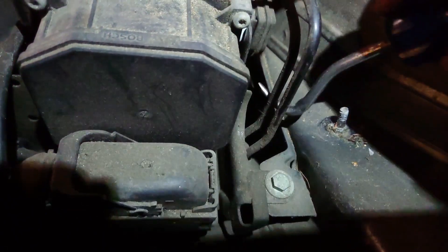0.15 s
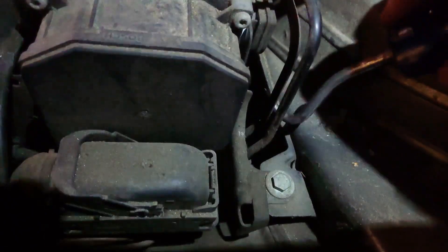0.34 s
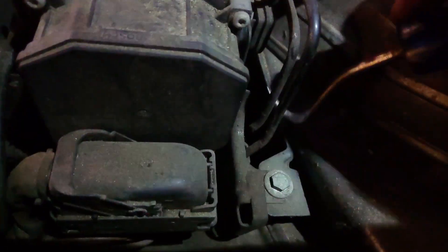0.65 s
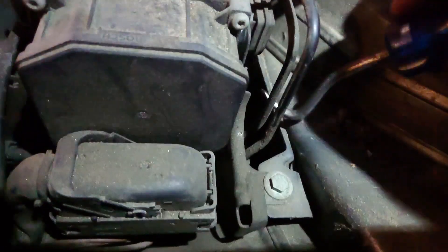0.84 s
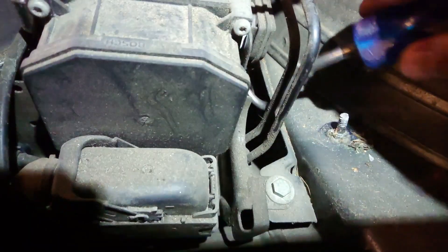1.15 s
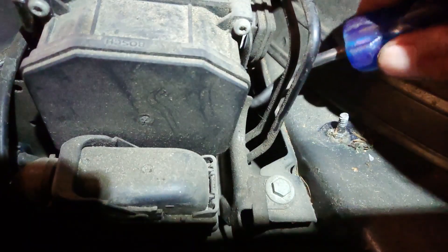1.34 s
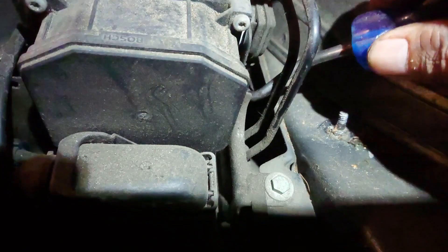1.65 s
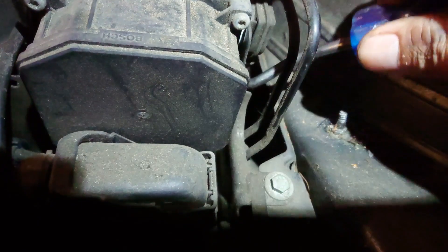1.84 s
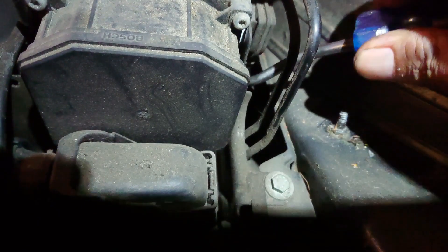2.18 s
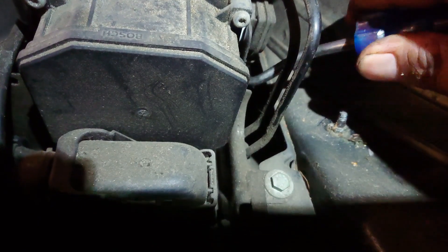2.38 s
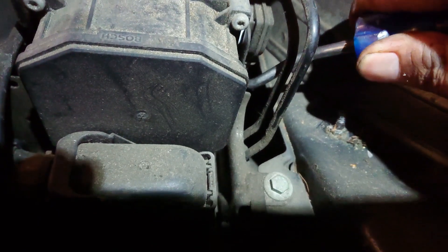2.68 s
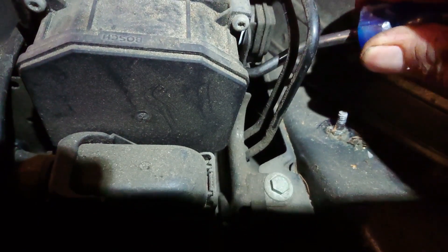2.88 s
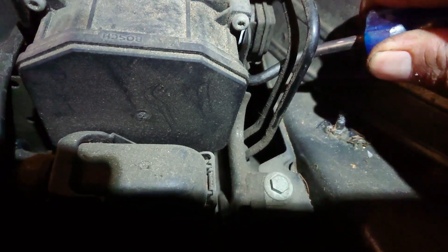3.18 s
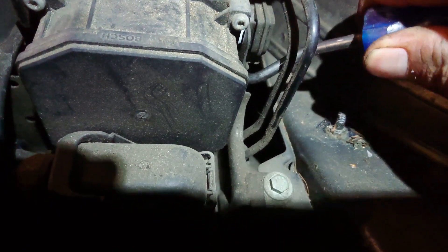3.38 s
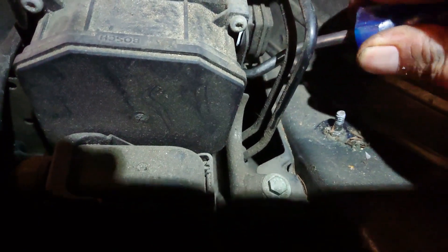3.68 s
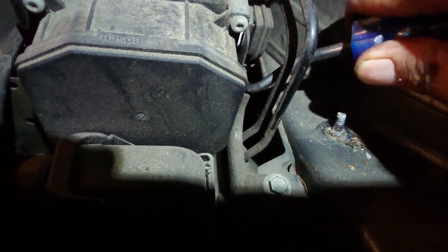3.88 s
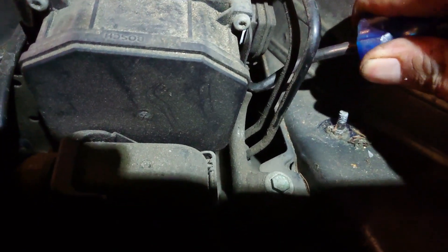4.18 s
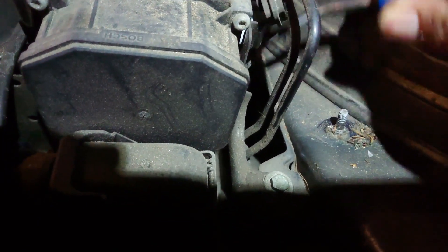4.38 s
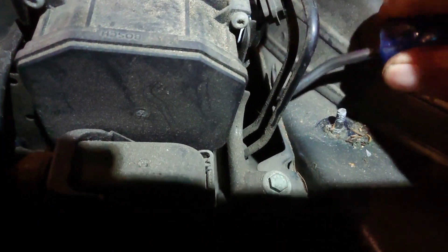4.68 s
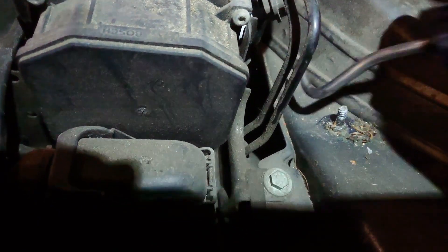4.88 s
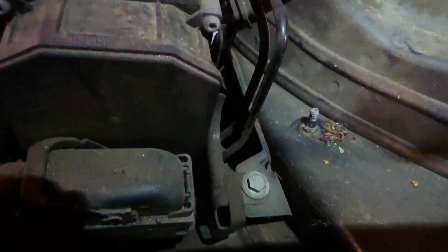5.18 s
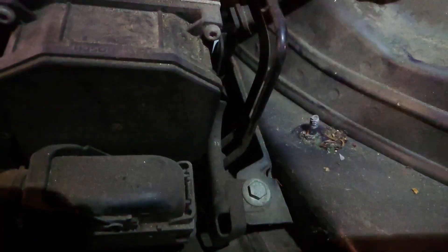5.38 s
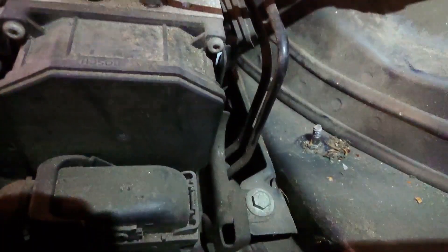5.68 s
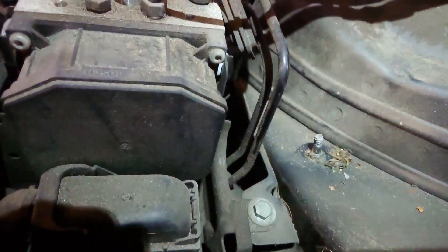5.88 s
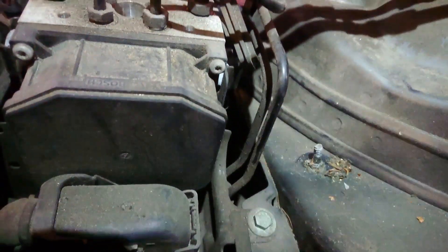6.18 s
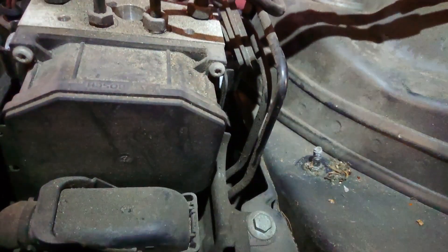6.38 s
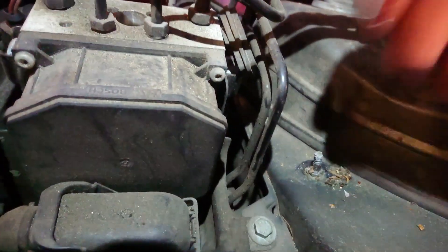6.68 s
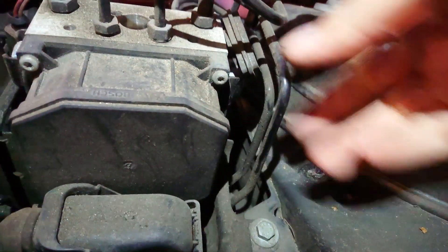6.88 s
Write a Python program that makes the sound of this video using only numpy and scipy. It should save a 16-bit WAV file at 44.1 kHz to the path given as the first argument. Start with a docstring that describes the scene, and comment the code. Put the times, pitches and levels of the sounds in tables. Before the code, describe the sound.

A hooked steel screwdriver works in a car engine bay, close to the microphone, over a low rumble in a quiet garage with a faint echo. For the first second its tip scrapes softly and taps on metal pipes, with a firmer click at about 1.2 seconds. Short, uneven, gritty scrapes and small dry ticks follow as it feels around plastic clips. The tip slips off with sharp snaps at about 2.9 and 3.8 seconds, then a louder cracking snap with a metallic clink and a dull thump at 4.4 seconds. A few more scrapes and a tick come around 5 seconds, and a tiny plastic creak at 5.4. From 5.6 to 6.2 seconds the tool is put down and bounces on a panel in a loud, quick clatter. A faint, thin metal ring lingers, with a slight scrape near 7 seconds.

```python
"""Prying clips in an engine bay

A hooked screwdriver scrapes along a car's pipes and plastic clips, close by in a quiet garage.
Its tip slips off with snaps that make the parts ring. After a short creak, the tool is put down
and bounces on a panel with a clatter. Small dry ticks sound by the microphone, over a low rumble."""
import sys
import numpy as np
from scipy import signal
from scipy.fft import rfft, irfft
from scipy.io import wavfile
from scipy.ndimage import uniform_filter1d

SR = 44100
rng = np.random.default_rng(int(sys.argv[2]) if len(sys.argv) > 2 else 0)


def inscribe(sig):
    """Save sig as 16-bit PCM at rate SR to the path in sys.argv[1].

    A 1-D sig is mono; a 2-D sig holds one channel per row.
    Samples are clipped to [-1, 1] before scaling.
    """
    pcm = np.round(np.clip(np.atleast_2d(sig).T, -1, 1) * 32767)
    wavfile.write(sys.argv[1], SR, pcm.astype(np.int16))


N = 310464

# A "colour" says how strong each pitch is. A "mode" is a note that a part rings at.
# A ring time (t60) is how long a sound takes to fade by 60 dB.
# background rumble and hiss: (frequency [Hz], level [dB])
BACKGROUND_COLOUR = [(15, -46), (25, -37), (53, 6), (80, 3.5), (796, -19), (1230, -17.5), (1840, -28),
                     (2220, -29), (3250, -35), (4490, -32), (5880, -41.5), (6920, -72.5), (9070, -60),
                     (11600, -39.5), (16000, -49.5)]
# how alike its left and right sides are: (frequency [Hz], likeness [0 to 1])
BACKGROUND_LIKENESS = [(60, 0.86), (300, 0.97), (1000, 0.082), (4000, .1)]
# the rumble is strong during the work, eases, then returns: (time [s], boost [dB])
RUMBLE_SWELL = [(0, 6.5), (3.302, 6.5), (4.7, 8), (4.9, 2), (6.499, 1), (7.04, 8.5)]

# colour of each sound: (frequency [Hz], level [dB])
ECHO_COLOUR = [(150, -27), (400, -20), (1200, -22), (3000, -25), (5500, -28), (11000, -32)]
TICK_COLOUR = [(120, 13), (300, 10.5), (700, 8), (1400, 3.5), (2300, 3.5), (3500, -5.5), (5300, -8),
               (8000, -33), (11000, -20.5), (15000, -30)]
SCRAPE_COLOUR = [(150, -11.5), (520, -1), (1000, -2), (1350, 0), (1750, -6.5), (2300, -2.5), (3100, -5.5),
                 (4300, 0.5), (5600, 0), (7000, -17.5), (8300, -23.5), (10300, -6), (15000, -16)]
PANEL_COLOUR = [(130, -6.5), (250, -8), (400, 2), (700, 0.5), (1250, 12), (1750, 3), (2300, -0.5),
                (3200, 0), (4300, 3), (5600, -12.5), (7000, -21.5), (8300, -31.5), (10300, -17.5),
                (15000, -28.5)]
CLIP_COLOUR = [(130, -12.5), (250, -9), (400, -1), (700, 3), (1250, 7), (1750, 0.5), (2300, 1),
               (3200, -3.5), (4300, -1.5), (5600, -4), (7000, -18), (8300, -28), (10300, -9.5),
               (15000, -25)]
# small parts give off little deep bass: (frequency [Hz], level [dB])
RADIATION = [(30, -34), (60, -4.5), (130, -7), (300, -4.5), (1300, -1.5), (3000, -3.5)]
# where the parts sit in stereo: (frequency [Hz], left minus right [dB])
PANEL_BALANCE = [(150, 2.5), (380, -3), (950, 4), (2380, 1.8), (5980, -8), (15000, 5)]
CLIP_BALANCE = [(60, 21), (150, 9.5), (380, 0), (950, 2), (2380, 4.5), (5980, 0.5), (15000, 7.5)]
# how long the crowd of weak modes lasts in the room and parts: (frequency [Hz], ring time [s])
GARAGE_RING = [(150, 0.66), (500, 1.0), (1500, 0.59), (3500, 0.92), (6000, 0.32), (12000, 0.4)]
TICK_RING = [(200, 0.044), (700, 0.049), (2000, 0.0054), (12000, 0.013)]
PANEL_RING = [(200, 0.061), (600, 0.25), (1300, 0.062), (3000, .08), (6000, .062), (12000, 0.041)]
CLIP_RING = [(200, 0.21), (600, 0.14), (1300, 0.069), (3000, 0.04), (6000, 0.015), (12000, 0.018)]
# strong modes that stand out of that crowd: (frequency [Hz], boost [dB], ring time [s])
CREAK_MODES = [(1690, 9.5, 0.012)]
PANEL_MODES = [(259, 12, 0.28), (345.6, 7, 0.13), (646, 7.5, 0.05), (936, 4.6, 0.047), (1229, 4.7, 0.042),
               (1569, 12, 0.086), (1870, 1.7, 0.1), (2250, 2.1, 0.079), (2480, 7.8, 0.045),
               (3180, 1.3, .06), (3322, 8.3, 0.014), (4830, 2.1, 0.059), (5400, 7.5, 0.019),
               (5770, 3.7, .04)]
PIPE_MODES = [(547, 14.5, 0.037), (940, 14, 0.035), (1350, 20, 0.058), (1950, 12.5, 0.083),
              (2316, 17.5, 0.017), (3426, 14, 0.07), (4340, 8.5, 0.023), (5230, 9.5, 0.042)]
CLIP_MODES = [(369, 3, 0.044), (740, 7, 0.041), (883, 3.5, 0.12), (1032, 6.5, 0.21), (1245, 8, 0.078),
              (1490, 4.5, 0.029), (2063, 5, .04), (2320, 9, 0.035), (3040, 5.5, 0.14), (3470, 7.5, 0.054),
              (3970, 7, .04), (4400, 3.5, 0.014), (5600, 1.5, 0.032)]
# modes of the steel shaft: (frequency [Hz], level [dB], ring time [s])
SHAFT_MODES = [(2060, -3, .035), (2220, -1, .04), (2380, 0, .04)]

# "Weight" is how much low thud a hit has; "edge" is how much sharp treble.
# dry ticks by the microphone: (time [s], force [dB], weight [dB])
TICKS = [(0.778, -13, -2), (2.438, -14.5, -6), (2.492, -16.5, -1), (2.756, -13.5, -4), (2.786, -12.5, -5.5),
         (3.7164, 0, -16), (5.0, -0.5, 2), (5.075, -22.5, 11.5), (5.086, -8, -2.5)]
# dull thumps: (time [s], level [dB], frequency [Hz], ring time [s])
THUMPS = [(3.778, -29.5, 66.9, 0.098), (4.385, -27, 113.9, 0.047), (4.408, -29.5, 59.7, 0.15),
          (4.999, -27, 135, .035), (5.569, -35, 182, 0.095)]
# the shaft meets a pipe: (time [s], level [dB], build-up [s])
CLINKS = [(1.895, -28.5, 0.001), (2.626, -29, 0.0022), (3.762, -22.5, 0.0026), (3.775, -18.5, 0.0012),
          (4.383, -10.5, 0.00074), (4.878, -27, 0.005)]
# thin metal ring left by the hardest bounce: (time [s], frequency [Hz], ring time [s])
LAST_RING = (6.095, 1125, 5.0)
# scrapes of the tip: (middle time [s], length [s], pressure [dB], bite [dB])
STROKES = [(0.029, 0.099, -52.5, -10), (0.286, 0.041, -61.5, 1), (0.385, 0.029, -57.5, -3.5),
           (0.468, 0.037, -57, -1), (0.719, 0.13, -59, 0), (1.007, 0.053, -52.5, -9),
           (1.096, 0.031, -48.5, -7.5), (1.29, 0.12, -46.5, -3), (1.38, 0.026, -39, 3),
           (1.556, 0.014, -44, -5.5), (1.641, 0.02, -41.5, -13), (1.728, 0.017, -37.5, -6),
           (1.812, 0.037, -44.5, -5.5), (1.962, 0.03, -46, 2), (2.075, 0.043, -44, -1),
           (2.172, 0.015, -54, 5.5), (2.618, 0.043, -50.5, 1), (2.676, 0.025, -55.5, 2.5),
           (2.846, 0.076, -44.5, -1), (3.205, 0.033, -47.5, -5.5), (3.274, 0.032, -40.5, -6),
           (3.39, 0.033, -57, 1.5), (3.487, 0.037, -38.5, 1), (3.664, 0.21, -55, -4),
           (3.881, 0.019, -34.5, -2), (4.074, 0.074, -53, 0), (4.19, 0.0061, -43.5, 5),
           (4.264, 0.0046, -39, 7.5), (4.301, 0.054, -44.5, 7.5), (4.505, 0.0092, -32, -1.5),
           (4.815, 0.074, -40, -10.5), (4.878, 0.035, -38, 0.5), (5.042, 0.072, -44, -2),
           (5.132, 0.039, -49, -5.5), (6.591, 0.036, -70, -1), (6.942, 0.007, -43.5, -8),
           (7.021, 0.03, -56.5, -6.5)]
# the steel shaft bounces on the panel: (time [s], force [dB], edge [dB], skid [s])
SHAFT_BOUNCES = [(5.566, 14.5, -2, 0.0044), (5.607, 3.5, 1, 0.0017), (5.634, 0, 1, 0.0021),
                 (5.675, 9, 7, 0.001), (5.693, 14.5, 5.5, 0.0028), (5.701, 14, 5, 0.0047),
                 (5.717, 13, 2, 0.0045), (5.752, 7.5, 10.5, 0.002), (5.83, -2, -1.5, 0.0045),
                 (5.977, 19, 2.5, 0.0017), (5.996, -1.5, 0, 0.003), (6.0133, 21.5, -1.5, 0.0023),
                 (6.056, 10, 4.5, 0.0012), (6.094, 21.5, 3.5, 0.0021), (6.1775, 17.5, -0.5, 0.0014),
                 (6.219, 10, 1.5, 0.0014)]
# the plastic handle knocks on the panel: (time [s], force [dB])
HANDLE_KNOCKS = [(5.733, 3), (5.767, -3), (5.779, -6.5), (5.953, 4)]
# the tip slips off and strikes: (time [s], force [dB], weight [dB], skid [s])
SLIPS = [(0.144, -12.5, 10, 0.0072), (0.933, -7, 5, 0.0042), (1.214, 6.5, 7, 0.003),
         (1.438, -18.5, 18.5, 0.003), (1.7645, -6, 15.5, 0.006), (1.8973, -9, -4, 0.004),
         (2.624, -4, 13.5, 0.0029), (2.874, 10, 6.5, 0.006), (2.8785, 18.5, -3, 0.0016),
         (3.7628, 6, 1.5, 0.0064), (3.7748, 17.5, 4, 0.0022), (4.384, 18, -4, 0.0037),
         (4.393, 12, -1.5, 0.0017), (4.401, 23.5, -5, 0.0037), (4.412, 15.5, -4, 0.0032)]

PAST_PIPES_S = 1.16  # the tip moves on from the pipes to the clips
PIPE_EDGE_DB = -14  # round pipes take the edge off a hit


def amp(db):
    """Turns decibels into a number to multiply by."""
    return 10 ** (np.asarray(db) / 20)


def evened(x):
    """Scales a signal to an average (rms) level of 1."""
    return x / np.sqrt(np.mean(x ** 2) + 1e-20)


def wobble(size, smooth_samples):
    """A random curve; more smoothing makes it slower."""
    return evened(uniform_filter1d(rng.standard_normal(size), size=smooth_samples))


def read(points, hz):
    """Looks up values between (Hz, value) points on a log-frequency scale."""
    f, value = np.transpose(points)
    return np.interp(np.log(hz + 1), np.log(f + 1), value)


def add(mix, s, sound):
    """Adds a stereo sound at time s."""
    start = round(s * SR)
    sound = sound[:, max(-start, 0):]
    part = mix[:, max(start, 0):][:, :sound.shape[1]]
    part += sound[:, :part.shape[1]]


def coloured(x, *colours, size=2048):
    """Filters by all the given colours, with no sound ahead of a hit (minimum phase)."""
    hz = abs(np.fft.fftfreq(size, 1 / SR))
    log_gain = np.log(amp(sum(read(colour, hz) for colour in colours)))
    taps = np.fft.ifft(np.exp(np.conj(signal.hilbert(log_gain)))).real
    return signal.fftconvolve(x, taps[None], axes=1)[:, :x.shape[1]]


def placed(x, balance):
    """Leans each pitch to the left or right."""
    left = coloured(x[[0]], [(hz, db / 2) for hz, db in balance])
    right = coloured(x[[1]], [(hz, -db / 2) for hz, db in balance])
    return np.vstack([left, right])


def pair(x, likeness, lag_s):
    """Makes two noises partly alike; a positive lag delays the right one."""
    shared = likeness * np.roll(x[0], round(lag_s * SR))
    return np.array([x[0], shared + np.sqrt(1 - likeness ** 2) * x[1]])


def tone(hz, t60, size=SR):
    """One fading note."""
    t = np.arange(size) / SR
    return amp(-60 * t / t60) * np.sin(2 * np.pi * hz * t)


def dying(noise, ring, skid_s=0., crack=0., crack_s=.001):
    """A crowd of weak modes: noise fades band by band. A crack lifts its start, a skid smears it."""
    size = noise.shape[1]
    t, hz = np.arange(size) / SR, np.fft.rfftfreq(size, 1 / SR)
    centres = np.geomspace(150, 15000, 13)
    masks = np.array([read(np.c_[centres, row], hz) for row in np.eye(len(centres))])
    power = amp(-60 * t / read(ring, centres)[:, None]) ** 2 * (1 + crack * np.exp(-t / crack_s))
    power = signal.lfilter([1], [1, -np.exp(-1 / (skid_s * SR + 1))], power)
    bands = irfft(rfft(noise) * masks[:, None], size) * np.sqrt(power)[:, None]
    # each band gets the share of energy it has in white noise
    share, energy = (masks ** 2).mean(1), (bands ** 2).sum(2).mean(1)
    return (bands * np.sqrt(share / energy)[:, None, None]).sum(0)


def ringing(x, modes, spread_db):
    """Strong modes ring on; their strength varies by spread_db, as the spot that is hit varies."""
    size = x.shape[1]
    delay = np.exp(-2j * np.pi * np.fft.rfftfreq(size))
    spectrum = rfft(x)
    for hz, db, t60 in modes:
        chance = rng.standard_normal() + .5 * rng.standard_normal((2, 1))
        height = amp(abs(db + spread_db * chance))
        pole = amp(-60 / (t60 * SR))
        zero = pole ** height
        turn = 2 * np.cos(2 * np.pi * hz / SR) * delay
        spectrum *= (1 - zero * turn + (zero * delay) ** 2) / (1 - pole * turn + (pole * delay) ** 2)
    return irfft(spectrum, size)


def touch(thud_db, knock_db, edge_db):
    """Colour of one hit: a soft, heavy one thuds and knocks, a hard one has an edge."""
    return [(480, thud_db), (850, knock_db), (1500, knock_db), (2200, 0), (4200, 0),
            (6200, 1.3 * edge_db), (10000, edge_db)]


def blows(hits, modes_at, ring, likeness, lag_s, crack, crack_s, snap_db, spread_db, grit_db, size=8192):
    """Each blow is a gritty skid of tiny impacts that makes the struck part ring."""
    out, snap = np.zeros((2, N)), np.zeros((2, size))
    snap[0, round(max(-lag_s, 0) * SR)] = snap[1, round(max(lag_s, 0) * SR)] = 1
    for s, force_db, colour, skid_s in hits:
        grit = amp(grit_db * wobble(size, 40))
        noise = pair(rng.standard_normal((2, size)), likeness, lag_s) * grit
        clean = np.exp(-skid_s / .0044)  # less skid, stronger snap
        body = dying(noise, ring, skid_s, crack, crack_s) + amp(snap_db) * clean * snap
        body = ringing(body, modes_at(s), spread_db)
        add(out, s, amp(force_db) * coloured(body, colour))
    return out


def on_pipes(s):
    """Whether the tip is still on the metal pipes at time s."""
    return s < PAST_PIPES_S


def touched_modes(s):
    """The modes of whatever the tip touches at time s."""
    return PIPE_MODES if on_pipes(s) else CLIP_MODES


def background(level_db=-56.5, waver_db=.45):
    """Low rumble and faint hiss, wavering slowly."""
    hz = np.fft.rfftfreq(N, 1 / SR)
    left, other = rfft(rng.standard_normal((2, N)))
    likeness = read(BACKGROUND_LIKENESS, hz)
    right = likeness * left + np.sqrt(1 - likeness ** 2) * other
    noise = evened(irfft(np.array([left, right]) * amp(read(BACKGROUND_COLOUR, hz)), N))
    rumble = irfft(rfft(noise) / (1 + (hz / 95) ** 4), N)
    swell = amp(np.interp(np.arange(N) / SR, *np.transpose(RUMBLE_SWELL)))
    return amp(level_db + waver_db * wobble(N, 8000)) * (noise - rumble + swell * rumble)


def garage_echo(x):
    """A faint, long echo. The walls gather sound from all sides, which evens out single notes."""
    frames = signal.stft(x, nperseg=256)[2]
    smooth = np.sqrt(abs(uniform_filter1d(abs(frames) ** 2, size=5, axis=1)))
    phases = np.exp(2j * np.pi * rng.random(frames.shape))
    scattered = signal.istft(smooth * phases, nperseg=256)[1][:, :N]
    tail = dying(rng.standard_normal((2, 32768)), GARAGE_RING, skid_s=.012)
    tail = coloured(tail, ECHO_COLOUR)
    return signal.fftconvolve(evened(scattered) * x.std(), tail, axes=1)[:, :N]


def ticks(rows, modes=(), size=4096):
    """Single snaps with next to no ring."""
    out, snap = np.zeros((2, N)), np.zeros((2, size))
    snap[:, 0] = 1
    for s, force_db, weight_db in rows:
        knock_db = 1 + .45 * weight_db
        edge_db = 5 + .3 * weight_db + PIPE_EDGE_DB * on_pipes(s)
        body = amp(-5.5) * snap + amp(-1) * dying(rng.standard_normal((2, size)), TICK_RING)
        body = ringing(body, modes, spread_db=0)
        add(out, s, amp(force_db) * coloured(body, touch(weight_db, knock_db, edge_db)))
    return coloured(out, TICK_COLOUR)


def creak(start_s=5.384, slips=5, gap_s=.0105, weight_db=-7):
    """Plastic sticks and slips at an even pace, one tick a slip, hardest near the middle."""
    progress = np.linspace(-1, 1, slips)
    forces_db = -11.5 - 7 * progress ** 2 + 3.5 * progress
    return ticks([(start_s + k * gap_s, db, weight_db) for k, db in enumerate(forces_db)], CREAK_MODES)


def last_ring():
    """A thin metal note that outlasts the clatter."""
    out = np.zeros((2, N))
    s, hz, t60 = LAST_RING
    add(out, s, amp([[-67], [-70]]) * tone(hz, t60))
    return out


def thumps():
    """Low thumps as the parts spring back, the microphone is jolted and the tool lands."""
    out = np.zeros((2, N))
    for s, db, hz, t60 in THUMPS:
        add(out, s, amp(db) * amp([[1], [-1]]) * tone(hz, t60))
    return out


def clinks():
    """The steel shaft chatters against a pipe and rings."""
    out, t = np.zeros((2, N)), np.arange(4096) / SR
    shaft = sum(amp(db) * tone(hz, t60, size=8192) for hz, db, t60 in SHAFT_MODES)
    for s, db, rise_s in CLINKS:
        chatter = rng.standard_normal((2, len(t))) * t * np.exp(-t / rise_s)
        clink = signal.fftconvolve(chatter, shaft[None], axes=1)
        add(out, s, amp(db) * amp([[1.5], [-1.5]]) * clink / abs(clink).max())
    return out


def light_rubs(until_s=2.75, gap_s=.11, length_s=.11, bite_db=-3.2):
    """Past the pipes, the tip feels for a hold with faint, uneven strokes."""
    beats = np.arange(PAST_PIPES_S, until_s, gap_s)
    chance = rng.standard_normal((len(beats), 2))
    return [(s + .1 * gap_s * late, length_s, -63.5 - 6.9 * lighter, bite_db)
            for s, (late, lighter) in zip(beats, chance)]


def pressed(modes, detune=.025, ring_share=.81):
    """The pressing tip shortens a part's ring and shifts its notes a little at each new spot."""
    shift = 1 + detune * rng.standard_normal()
    return [(hz * shift, db, t60 * ring_share) for hz, db, t60 in modes]


def scraping(grain_db=3, catch_db=3, size=16384):
    """Steel drags over dusty pipes and plastic: fine grains catch, let go and make the part ring."""
    out, t = np.zeros((2, N)), np.arange(size) / SR
    middle = t[-1] / 2
    for s, length_s, pressure_db, bite_db in STROKES + light_rubs():
        catches = wobble(size, 200)
        strengths = amp(grain_db * np.minimum(rng.exponential(1, size), 5) + catch_db * catches)
        grains = evened(pair(rng.standard_normal((2, size)) * strengths, likeness=.097, lag_s=.00023))
        swell = np.exp(-2 * ((t - middle) / length_s) ** 2)
        stroke = ringing(grains * swell, pressed(touched_modes(s)), spread_db=4.25)
        # a biting tip rasps and hisses; the smooth pipes hiss less
        hiss_db = .5 + bite_db - 4.5 * on_pipes(s)
        rasp = [(2500, 0), (3800, bite_db), (6000, bite_db), (10000, hiss_db)]
        add(out, s - middle, amp(pressure_db) * coloured(stroke, rasp))
    return placed(coloured(out, SCRAPE_COLOUR), CLIP_BALANCE)


def putting_down(settling_db_per_s=15):
    """The tool's shaft and handle land on a panel, rock and bounce."""
    landing_s = SHAFT_BOUNCES[0][0]
    hits = []
    for s, force_db, edge_db, skid_s in SHAFT_BOUNCES:
        # harder bounces thud less; the thud also fades as the tool settles
        thud_db = 12.5 - .52 * force_db - settling_db_per_s * (s - landing_s)
        hits.append((s, force_db, touch(thud_db, knock_db=-5, edge_db=edge_db), skid_s))
    handle_colour, handle_skid_s = touch(thud_db=22, knock_db=15, edge_db=2.5), .00033
    hits += [(s, force_db, handle_colour, handle_skid_s) for s, force_db in HANDLE_KNOCKS]
    clatter = blows(hits, lambda s: PANEL_MODES, PANEL_RING, likeness=.29, lag_s=-.00036,
                    crack=8.1, crack_s=.00072, snap_db=-6, spread_db=2, grit_db=3)
    return placed(coloured(clatter, PANEL_COLOUR, RADIATION), PANEL_BALANCE)


def prying():
    """The tip slips off the clips and strikes the pipes and housing."""
    hits = []
    for s, force_db, weight_db, skid_s in SLIPS:
        knock_db = -5 + .45 * weight_db  # a heavy blow knocks as well as thuds
        edge_db = 2.5 + PIPE_EDGE_DB * on_pipes(s)
        hits.append((s, force_db, touch(weight_db, knock_db, edge_db), skid_s))
    snaps = blows(hits, touched_modes, CLIP_RING, likeness=.26, lag_s=.00023,
                  crack=2, crack_s=.005, snap_db=-.5, spread_db=0, grit_db=1.5)
    return placed(coloured(snaps, CLIP_COLOUR, RADIATION), CLIP_BALANCE)


def scene():
    """Mixes the tool and its echo with the dry ticks, the creak and the background."""
    work = prying() + putting_down() + scraping() + thumps() + clinks() + last_ring()
    lean_left = amp([[2], [-2.5]])
    return work + garage_echo(work) + lean_left * (ticks(TICKS) + creak()) + background()


def record(dry, low_cut_hz=47, ceiling=.9, high_cut_hz=16100):
    """The microphone cuts the deepest bass, rounds off the tallest peaks and cuts the top treble."""
    heard = signal.sosfilt(signal.butter(3, low_cut_hz, "high", fs=SR, output="sos"), dry)
    limited = heard / (1 + (heard / ceiling) ** 6) ** (1 / 6)
    high_cut = signal.firwin(511, high_cut_hz, window=("kaiser", 9), fs=SR)
    return signal.oaconvolve(limited, high_cut[None], "same")


dry = scene()
out = record(dry)
inscribe(out)
```